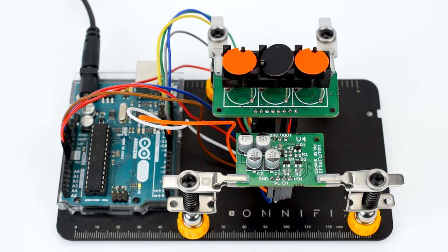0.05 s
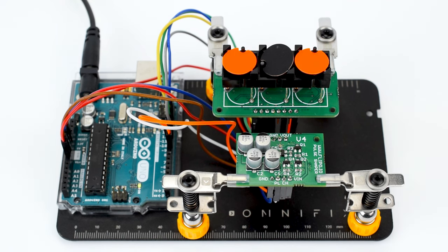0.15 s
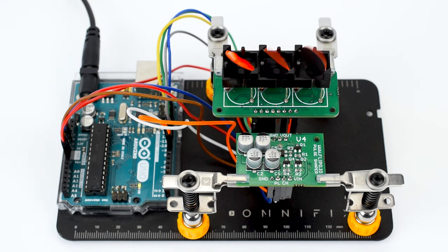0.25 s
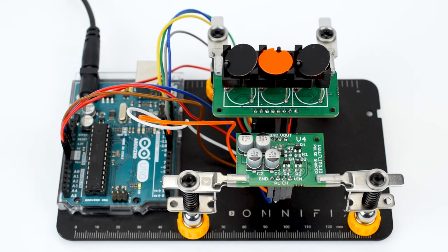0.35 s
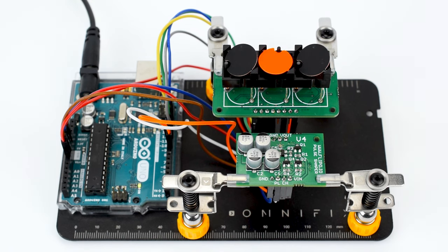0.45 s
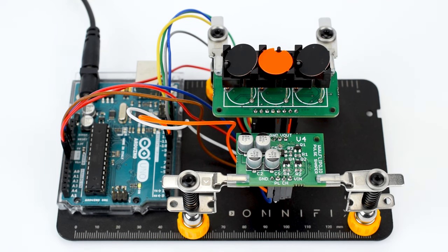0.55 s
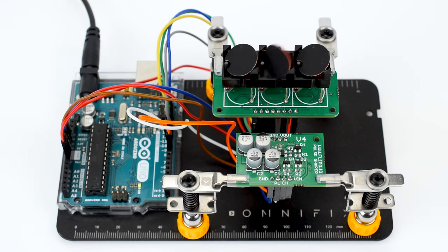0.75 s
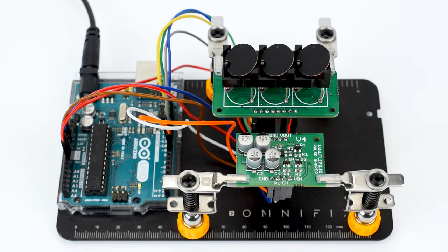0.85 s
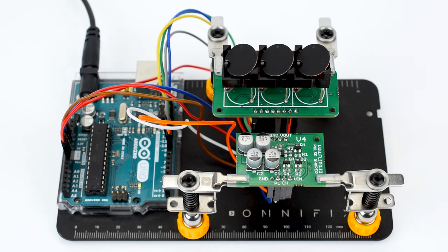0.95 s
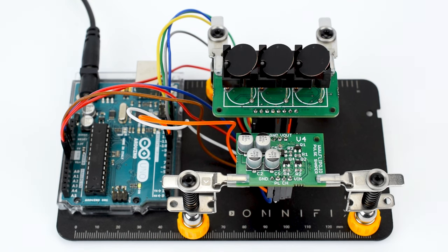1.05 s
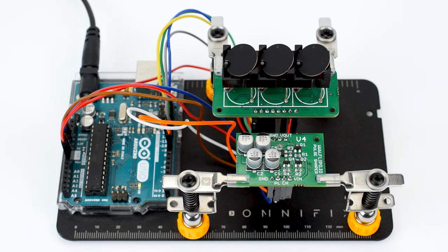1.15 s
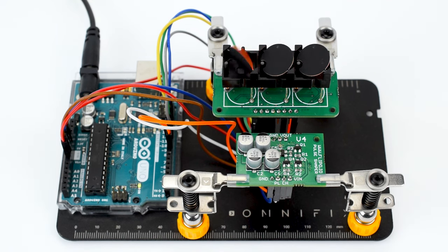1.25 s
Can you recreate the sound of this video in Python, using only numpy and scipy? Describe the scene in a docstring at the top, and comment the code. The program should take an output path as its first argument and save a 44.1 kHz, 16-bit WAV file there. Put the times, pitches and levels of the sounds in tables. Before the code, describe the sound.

Small flip discs click sharply as they turn over in a quiet room.

```python
"""A quiet room, close up on three small flip discs on a circuit board.
A coil kicks each disc off its rest with a bright tick; some 75 ms later it slaps its stop and bounces,
ringing the plastic frame and the board. The whole row flips with a faint whirr, then the middle disc;
the left one gives a last lone tick. The room answers briefly over soft ventilation and mains hum."""
import sys
import numpy as np
from scipy import signal
from scipy.fft import rfft, irfft, next_fast_len
from scipy.io import wavfile

SR = 44100
rng = np.random.default_rng(int(sys.argv[2]) if len(sys.argv) > 2 else 0)


def generate_wav(signal):
    """Clip the signal to [-1, 1] and save it as 16-bit WAV at the path in sys.argv[1]."""
    frames = np.transpose(np.atleast_2d(signal))
    scaled = np.clip(frames, -1, 1) * 32767
    pcm = np.round(scaled).astype(np.int16)
    wavfile.write(sys.argv[1], SR, pcm)


N = 57330

# coil kick cues: t/s, disc, ring level/dB, clatter level/dB, crack level/dB, board level/dB
KICK_CUES = [(.2378, "row", -37.5, -50, -45, -57), (.2393, "row", -33.5, -32, -33.5, -64),
             (0.2463, "row", -46, -42, -35, -54.5), (.2612, "row", -48.5, -46.5, -39.5, -51),
             (.2702, "row", -54, -60, -52, -78), (0.7431, "middle", -25, -31, -27.5, -69),
             (1.2459, "left", -40, -40.5, -52, -87)]
# landing and bounce cues: the same columns, then board clatter level/dB
STOP_CUES = [(.318, "row", -27.5, -31, -19, -41, -41.5), (0.3304, "row", -35.5, -28.5, -28, -36.5, -40),
             (0.8134, "middle", -27.5, -30, -24.5, -45.5, -60),
             (0.8338, "middle", -39.5, -53, -35.5, -50.5, -62.5)]
# whirr cue, in mid swing: t/s, length/s, level/dB
SWING_CUES = [(0.259, .031, -59)]
# ring of a kicked disc, by disc: f/Hz, relative level/dB, t60/s
KICK_MODES = { "row": [(5280, 3.5, .045), (5150, -8, .05), (5710, 0, .05), (6020, -3.5, .04),
              (6880, -5, .045), (7200, -2, .045), (7370, -2.5, 0.055), (7700, -3, 0.027),
              (9430, -17, 0.059), (10240, -30, .04)], "middle": [(2860, -22.5, 0.053), (5350, -13, 0.043),
              (5360, -7.5, 0.038), (6710, 0, 0.022), (6860, 3.5, 0.027), (7350, -1.5, .03),
              (9230, -10.5, .035), (10800, -19, 0.09), (11240, -26, 0.044)], "left": [(2930, -22, 0.047),
              (5330, -3.5, 0.022), (6180, -15, 0.082), (7770, -10.5, .04), (7690, -3.5, 0.037),
              (8050, -4, 0.058), (8700, -19, .04), (9280, -14, 0.044)]}
# ring of a disc against its stop, by disc: f/Hz, relative level/dB, t60/s
STOP_MODES = { "row": [(5130, -2, .05), (5500, -3, 0.14), (6900, 0.5, 0.028), (7170, -23, .04),
              (7575, -11, .05), (7980, -11, .04), (8215, 11, .035), (8330, -9, .045), (8450, 13, .025),
              (9060, 2, .04), (9225, 4.5, 0.085), (9530, -11, 0.032), (9350, -16, .035)],
              "middle": [(5480, 0.5, 0.03), (5600, -34, .045), (6230, -0.5, 0.032), (7230, 5.5, 0.022),
              (7130, 3, 0.021), (7760, -2, 0.051), (8080, -0.5, 0.034), (8170, 2.5, 0.019),
              (8490, -0.5, .04), (9100, -20, .04), (9470, 1.5, 0.041), (11720, -8, 0.05)]}
# body of the board, shaken by the row or the middle disc: f/Hz, relative level/dB, t60/s
BOARD_MODES = { "row": [(850, -17.5, .09), (943, -25, .1), (1736, -6, .08), (2033, 1, 0.049),
               (2194, -0.5, .06), (2237, -3.5, .06), (2582, -6.5, 0.12), (2946, -5, .06), (3360, -14, .05)],
               "middle": [(807, -10.5, .1), (990, -3, 0.066), (1532, -12.5, 0.09), (2543, 1, 0.062),
               (2628, 0.5, 0.042), (2860, 3.5, 0.045), (3350, -4.5, 0.068), (3614, -1.5, 0.03)]}
# colour of the dense, short modes at a kick, by disc: f/Hz, relative level/dB
KICK_CLATTER = { "row": [(1200, -34), (1650, -13.5), (2800, -25), (4400, -26), (5100, -5.5), (7300, 0),
                (9400, -3.5), (11300, -8.5), (13000, -15.5), (15500, -24)], "middle": [(1500, -45),
                (2300, -37), (2900, -18), (4500, -37), (5200, -0.5), (5900, -11.5), (6900, 7.5),
                (7900, -6.5), (9400, -9.5), (11300, -12.5), (13000, -21), (15500, -26)],
                "left": [(1500, -45), (4500, -37.5), (5200, -3), (6900, -10.5), (7900, 7), (8600, -3),
                (9400, -3), (11000, -16.5), (15500, -19.5)]}
# the same at a landing, by disc: f/Hz, relative level/dB
STOP_CLATTER = { "row": [(600, -39), (2500, -32.5), (4700, -20), (5280, -1.5), (5800, -13), (6400, -10.5),
                (7200, 1.5), (8350, 0.5), (9500, -1.5), (11300, -10.5), (13200, -18.5), (15500, -27)],
                "middle": [(600, -45), (2500, -28), (4600, -27), (5200, -2), (6300, -13), (7300, 6),
                (8400, -2), (9500, -2), (11300, -8), (13200, -18), (15500, -24)]}
# the same for the shaken board: f/Hz, relative level/dB
BOARD_CLATTER = [(300, -52), (650, -25), (920, 0.5), (1200, -29.5), (1450, -11.5), (1700, -1), (2150, -3.5),
                 (2700, 0.5), (3100, -4), (3600, -5.5), (4000, -7.5), (6000, -21)]
# bands of the pivot whirr: f/Hz, half-width/Hz, relative level/dB
PIVOT_TONES = [(2060, 34, -4.5), (2170, 200, 2.5), (2883, 29, 6)]
# room decay: f/Hz, t60/s
ROOM_T60 = [(500, 0.17), (2500, 0.16), (5300, 0.17), (8000, 0.18), (15000, 0.12)]
# tone of the room's tail: f/Hz, level/dB
ROOM_COLOUR = [(800, 5), (2500, -1), (5300, 0), (7500, -1), (11000, 0), (15000, -1)]
# stereo width of the dry clicks: f/Hz, side over mid level/dB
CLICK_WIDTH = [(1000, -36), (4000, -26), (8000, -11), (13000, -5)]
# lean of the clicks and their tail: f/Hz, left over right level/dB
BALANCE = [(1000, 0), (5000, -0.5), (9000, -0.6), (13000, -3.5)]
# colour of the ventilation: f/Hz, relative level/dB
AIR_COLOUR = [(25, 1.5), (50, -12), (100, -12), (190, -15), (290, -18.5), (370, -11.5), (650, -12.5),
              (900, -11), (1250, -11.5), (2500, -15.5), (4000, -18), (8000, -25.5), (12000, -30.5),
              (13500, -41), (16000, -57.5)]
# stereo width of the ventilation: f/Hz, side over mid level/dB
AIR_WIDTH = [(30, -8), (100, -3), (400, -10), (1500, -2), (5000, 0), (12000, -1)]

KICK_T60_S, STOP_T60_S, BOARD_T60_S, CRACK_T60_S = .035, .04, .082, .0056
RING_ATTACK_S, BOARD_ATTACK_S, CLATTER_ATTACK_S, CRACK_ATTACK_S = .00033, .001, .0004, .0001
MODE_SCATTER_DB, PHASE_SCATTER_CYCLES = .5, .45
DISC_BLUR_HZ, BOARD_BLUR_HZ, BLUR_TIME_S = 73.4, 18, .0027  # a loose disc rattles, smearing the pitch
RADIATE_HZ = 680  # the small parts radiate little below this
RING_SEND_DB = -4.5  # the discs' ring beams at the microphone and reaches the walls more weakly
ROOM_DB, ROOM_ONSET_S, ROOM_SIDE_DB = -11, .0063, -6
AIR_DB, HUM_HZ, HUM_DB = -69.5, 121.4, -86
FAN_HZ, FAN_DB, WHINE_HZ, WHINE_DB = 998, -84.5, 4940, -87
TOP_HZ = 15950
T = np.arange(int(SR * .3)) / SR  # time within one hit, s


def coil_kicks():
    """The bright tick: a coil jerks a disc off its rest; it may knock in its bearing."""
    track = np.zeros((2, N))
    for start_s, disc, *levels in KICK_CUES:
        tick = hit(KICK_MODES[disc], BOARD_MODES["row"], KICK_CLATTER[disc], KICK_T60_S, *levels)
        add(track, start_s, tick)
    return track


def stop_slaps():
    """The fuller clack: a disc slaps its stop and shakes the whole board."""
    track = np.zeros((2, N))
    for start_s, disc, *levels, shake_db in STOP_CUES:
        slap = hit(STOP_MODES[disc], BOARD_MODES[disc], STOP_CLATTER[disc], STOP_T60_S, *levels)
        shake = amp(shake_db) * noise(BOARD_CLATTER, len(T)) * fade(BOARD_T60_S, BOARD_ATTACK_S)
        add(track, start_s, slap + shake)
    return track


def hit(disc_modes, board_modes, colour, clatter_t60_s, ring_db, clatter_db, crack_db, board_db):
    """One blow in four layers: disc ring, clatter, crack and board body. Returns dry feed and room send."""
    disc = amp(ring_db) * ring(disc_modes, RING_ATTACK_S, DISC_BLUR_HZ)
    clatter = amp(clatter_db) * noise(colour, len(T)) * fade(clatter_t60_s, CLATTER_ATTACK_S)
    crack = amp(crack_db) * noise(colour, len(T)) * fade(CRACK_T60_S, CRACK_ATTACK_S)
    board = amp(board_db) * ring(board_modes, BOARD_ATTACK_S, BOARD_BLUR_HZ)
    knock = clatter + crack + board
    return np.array([disc + knock, amp(RING_SEND_DB) * disc + knock])


def ring(modes, attack_s, blur_hz):
    """A struck part's damped modes start nearly in step and waver in pitch, a little different each hit."""
    hz, db, t60 = np.transpose(modes)[:, :, None]
    gain = amp(db + MODE_SCATTER_DB * rng.standard_normal(db.shape))
    pole = np.exp(-1 / (SR * BLUR_TIME_S))
    drift = unit(signal.lfilter([1], [1, -pole], rng.standard_normal((len(hz), len(T)))))
    start_phase = PHASE_SCATTER_CYCLES * rng.random(hz.shape)
    cycles = hz * T + blur_hz * np.cumsum(drift, 1) / SR + start_phase
    partials = gain * np.sin(2 * np.pi * cycles) * fade(t60, attack_s)
    return np.sum(partials, 0) * np.sqrt(2) / np.linalg.norm(gain)


def pivot_whirr():
    """The discs whirr faintly on their pivots as they swing."""
    track = np.zeros((2, N))
    for start_s, length_s, db in SWING_CUES:
        n = int(length_s * SR)
        whirr = sum(amp(level) * unit(fuzzy_tone(hz, width)[:n]) for hz, width, level in PIVOT_TONES)
        add(track, start_s, amp(db) * unit(whirr) * signal.windows.tukey(n, .2))
    return track


def in_room(feeds):
    """Places the discs in stereo: bass cut, slightly wide and to the right, with the room behind."""
    low_cut = signal.butter(N=4, Wn=RADIATE_HZ, btype="high", fs=SR, output="sos")
    direct, send = signal.sosfilt(low_cut, feeds)
    mid = direct + room_reverb(send)
    spread = filtered(direct, lambda hz: 1j * amp(along(CLICK_WIDTH, hz)))  # 90 degrees from the mid
    side = spread + amp(ROOM_SIDE_DB) * room_reverb(send)
    stereo = np.array([mid + side, mid - side])
    return filtered(stereo, lambda hz: amp(np.outer([.5, -.5], along(BALANCE, hz))))


def room_reverb(send):
    """The walls answer with a short, diffuse tail whose top end dies first."""
    hz, t, spectrum = signal.stft(rng.standard_normal(len(T)), SR, nperseg=256)
    decay = np.exp(-np.log(1000) * t / along(ROOM_T60, hz)[:, None])
    tail = signal.istft(spectrum * decay, SR, nperseg=256)[1][:len(T)]
    tail *= 1 - np.exp(-(T / ROOM_ONSET_S) ** 2)
    tail = filtered(tail / np.linalg.norm(tail), lambda hz: amp(along(ROOM_COLOUR, hz)))
    return amp(ROOM_DB) * signal.fftconvolve(send, tail)[:N]


def room_tone():
    """The bed: ventilation with one fuzzy fan tone, a thin whine and mains hum."""
    fan = amp(FAN_DB) * fuzzy_tone(FAN_HZ, half_width_hz=16)
    whine = amp(WHINE_DB) * fuzzy_tone(WHINE_HZ, half_width_hz=61)
    hum = amp(HUM_DB) * unit(np.sin(2 * np.pi * HUM_HZ * np.arange(N) / SR))
    mid = amp(AIR_DB) * noise(AIR_COLOUR, N) + fan + whine + hum
    side = amp(AIR_DB) * filtered(noise(AIR_COLOUR, N), lambda hz: amp(along(AIR_WIDTH, hz)))
    return np.array([mid + side, mid - side])


def fuzzy_tone(centre_hz, half_width_hz):
    """A narrow band of noise at rms 1."""
    white = rng.standard_normal(N)
    return unit(filtered(white, lambda hz: 1 / (1 + ((hz - centre_hz) / half_width_hz) ** 2)))


def noise(colour, size):
    """Coloured noise at rms 1."""
    return unit(filtered(rng.standard_normal(size), lambda hz: amp(along(colour, hz))))


def fade(t60, attack_s):
    """Percussive envelope: quick rise, exponential decay."""
    return np.exp(-np.log(1000) * T / t60) * (1 - np.exp(-T / attack_s))


def filtered(x, response):
    """EQ: multiplies the spectrum by a function of frequency."""
    n = x.shape[-1]
    padded = next_fast_len(n + 4096)
    return irfft(rfft(x, padded) * response(np.fft.rfftfreq(padded, 1 / SR)), padded)[..., :n]


def along(points, hz):
    """Reads a breakpoint curve on a log frequency axis."""
    freqs, values = np.transpose(points)
    return np.interp(np.log(hz + 1), np.log(freqs + 1), values)


def add(track, start_s, sound):
    """Mixes a sound in at its cue."""
    part = track[..., round(start_s * SR):][..., :sound.shape[-1]]
    part += sound[..., :part.shape[-1]]


def amp(db):
    """Decibels to gain."""
    return 10 ** (np.asarray(db) / 20)


def unit(x):
    """Normalises to rms 1."""
    return x / np.sqrt(np.mean(x ** 2) + 1e-20)


def scene():
    """The mix: discs up front, room tone underneath."""
    return in_room(coil_kicks() + pivot_whirr() + stop_slaps()) + room_tone()


def record(dry):
    """A steep high cut on the whole mix."""
    return filtered(dry, lambda hz: 1 / np.sqrt(1 + (hz / TOP_HZ) ** 140))


dry = scene()
out = record(dry)
generate_wav(out)
```